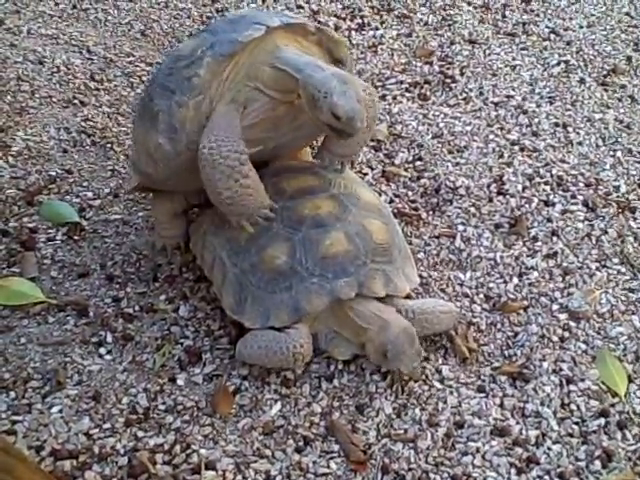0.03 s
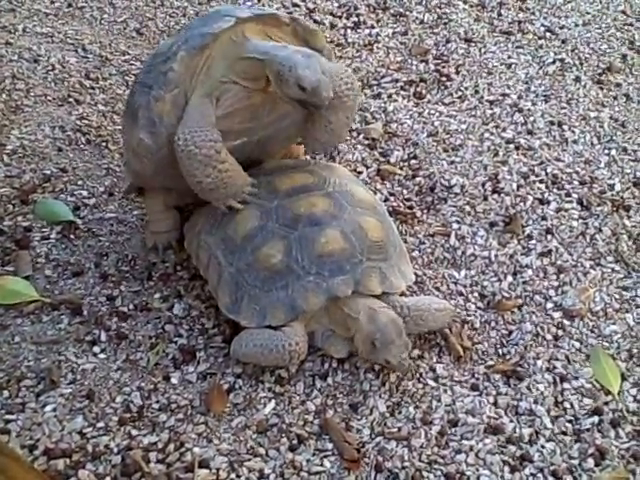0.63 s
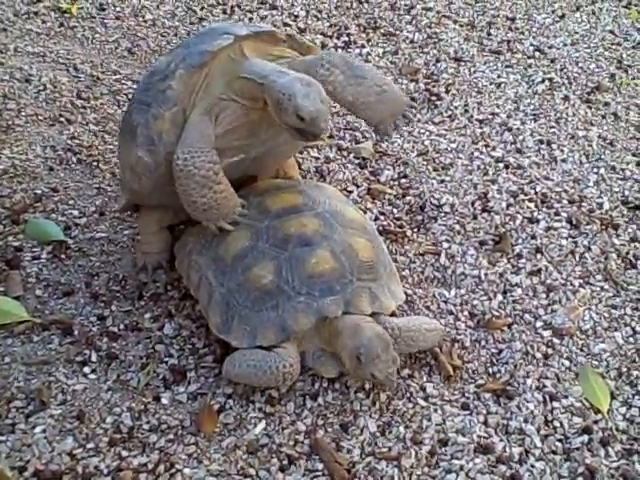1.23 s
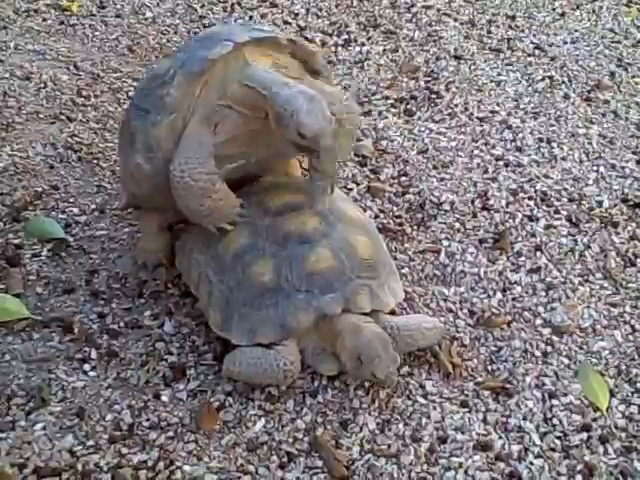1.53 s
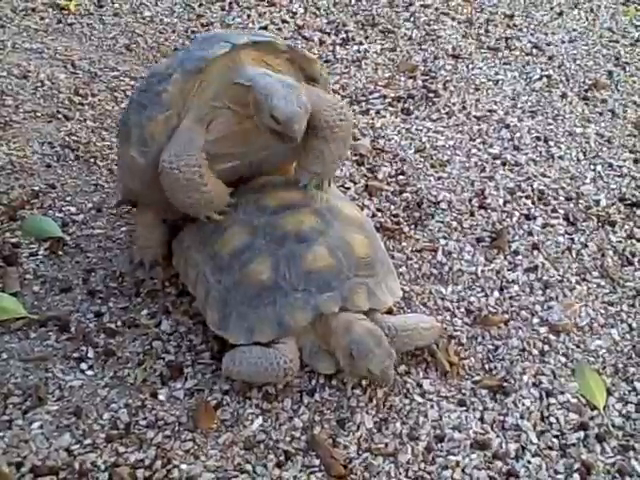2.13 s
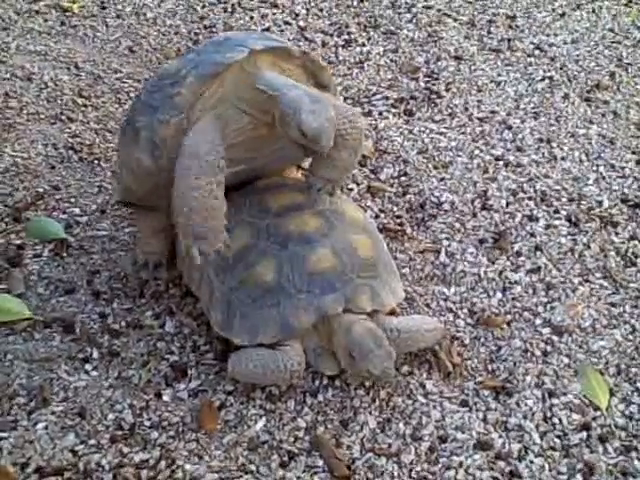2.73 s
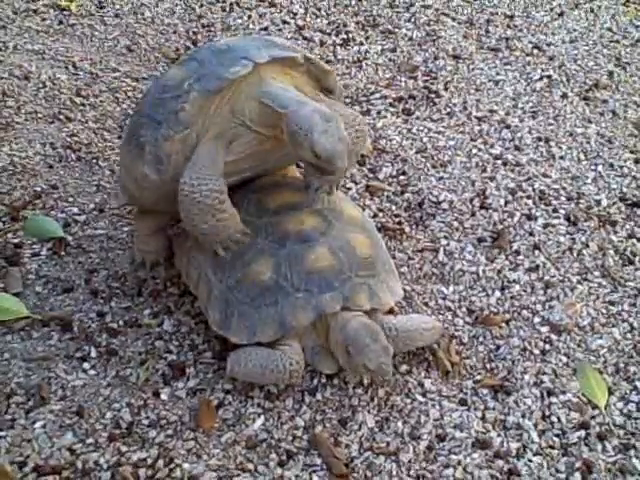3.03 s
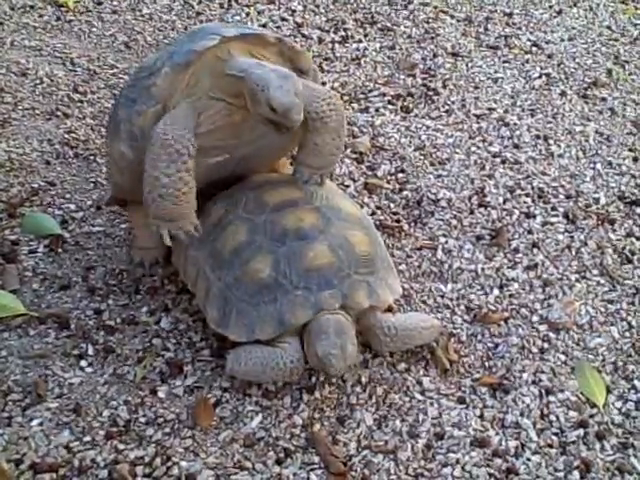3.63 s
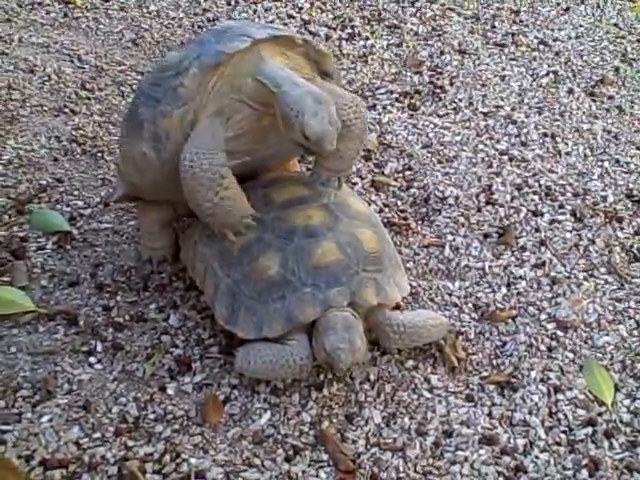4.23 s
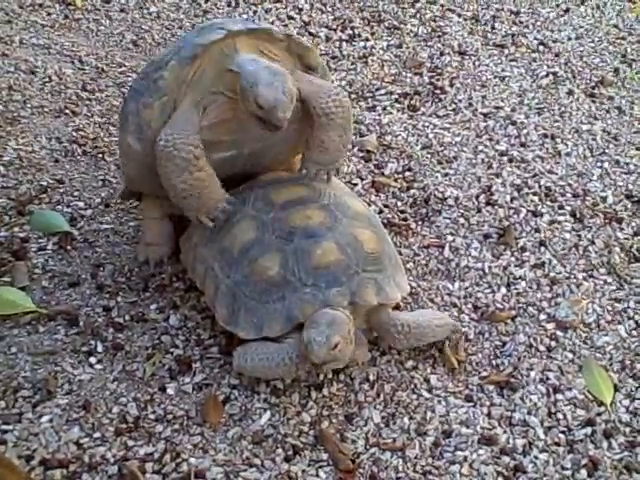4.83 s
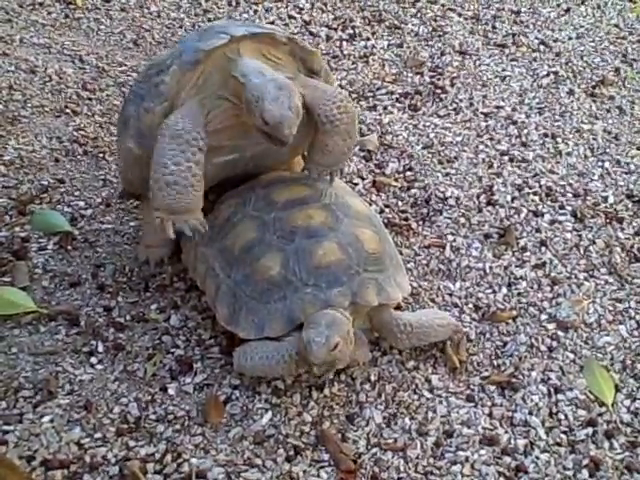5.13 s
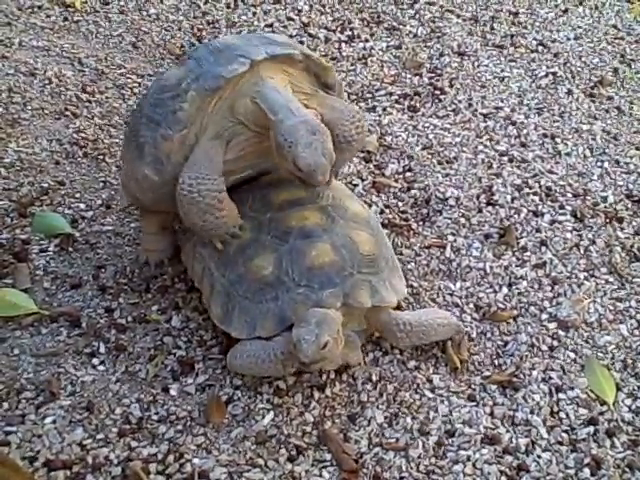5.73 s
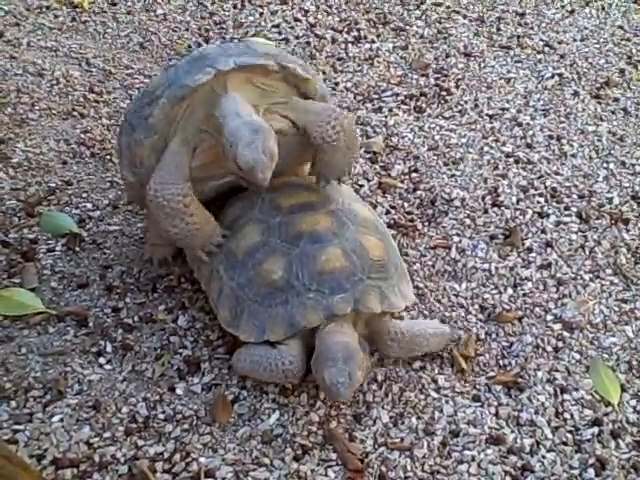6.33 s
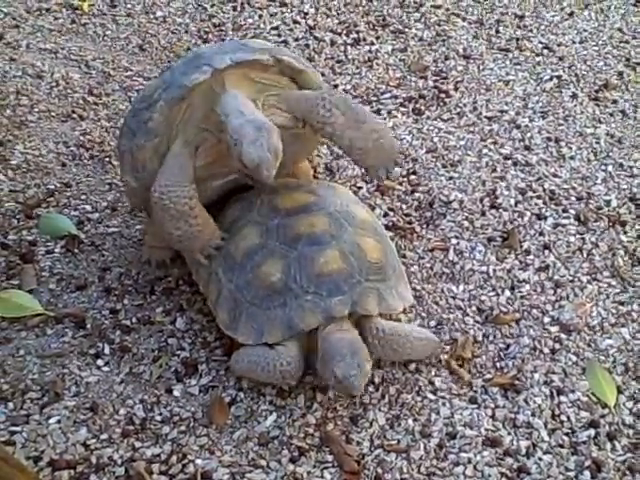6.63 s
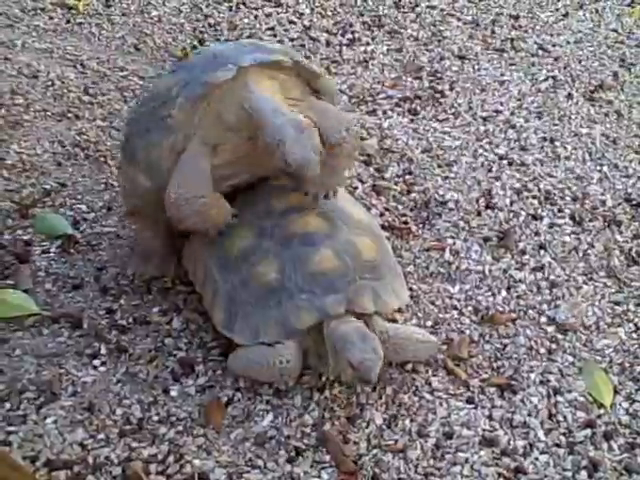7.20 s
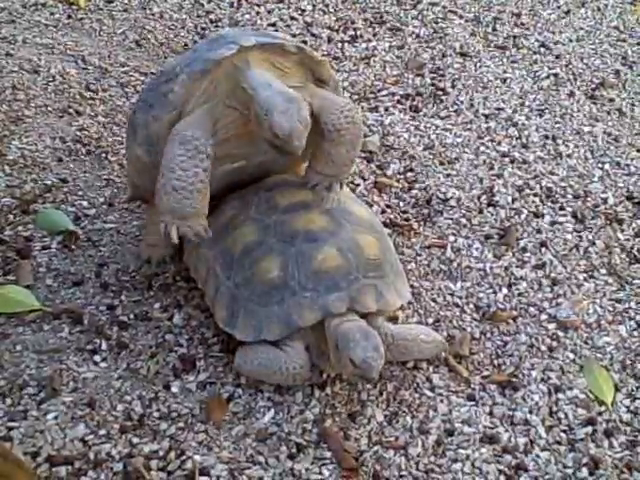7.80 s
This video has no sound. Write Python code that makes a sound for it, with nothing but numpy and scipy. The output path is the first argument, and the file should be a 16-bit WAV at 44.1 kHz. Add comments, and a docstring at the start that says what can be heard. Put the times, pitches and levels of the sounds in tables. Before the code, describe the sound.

On open ground with no echo, a tortoise lets out raspy, breathy grunts in pairs, at an even pace. Between them, shells and feet shove gravel in short bursts, single stones snap sharply, and the shells briefly rub and knock. Soft gusts buffet the small microphone, which makes clicks and hiss sound bright. A distant hum runs underneath, and one faint, far hoot comes near the end.

```python
"""A male tortoise gives a hoarse double grunt with each thrust as two tortoises mate on gravel.
His voice is a train of uneven snaps that ring in his chest, throat and mouth, with puffs of hiss.
Shells and feet shove the gravel, shells rub and knock, and single stones click. Light wind rumbles
on a small camera's microphone, whose opening rings near 7 kHz and sharpens every click and hiss.
Behind it all are a far hum and one faint hoot."""
import sys
import numpy as np
from scipy.fft import rfft, irfft, next_fast_len
from scipy.io import wavfile
from scipy.ndimage import map_coordinates

SR = 44100
rng = np.random.default_rng(int(sys.argv[2]) if len(sys.argv) > 2 else 0)


def persist_wave(psi):
    """Save psi, clipped to +-1, as 16-bit WAV."""
    counts = np.round(np.clip(psi, -1, 1) * 32767).astype(np.int16)
    wavfile.write(sys.argv[1], SR, np.atleast_2d(counts).T)


N = 351036

# tone of the wind's slow buffeting, its rumble, the far hum and the steady hiss: f/Hz, level/dB
BUFFET_TONE = [(5, -17), (18, 7), (35, 2.5), (50, 1), (70, -13), (130, -48)]
RUMBLE_TONE = [(30, -32.5), (48, -7), (62, 2), (85, -4.5), (110, -10), (150, -23.5), (300, -53)]
HUM_TONE = [(50, -14), (100, 0.5), (135, -2.5), (165, -0.5), (195, -9), (222, -8), (241, -4), (262, -9.5),
            (300, -14), (400, -17.5), (900, -61.5)]
AIR_TONE = [(150, -18.5), (330, -2.5), (520, -0.5), (800, -2), (1250, -8.5), (3000, -7), (4700, -9.5),
            (5400, -5.5), (6000, 0), (6550, 1.5), (7400, -4), (7900, -14.5), (8400, -18), (9300, -56.5)]
# gusts on the microphone: peak t/s, width/s, buffet level/dB, rumble level/dB
GUSTS = [(0.11, .025, -34, -58), (0.825, .028, -33, -32.5), (1.61, .04, -29, -42), (1.71, .025, -27, -41),
         (1.875, .03, -31, -37), (2.5, .3, -45, -48), (6.65, .02, -50, -40), (7.12, .08, -46, -43),
         (7.6, .03, -50, -37), (7.73, .07, -31, -37)]
# the course of a far, falling hoot: t/s, f/Hz, level/dB
HOOT = [(6.75, 419, -75), (6.8, 397, -57), (6.835, 355, -45), (6.869, 365, -54), (6.91, 351.3, -75)]
# shell rubbing on shell: middle t/s, level/dB, width/s, f/Hz
RUBS = [(0.61, -46.5, .01, 1500), (1.963, -41, 0.0036, 3200), (4.659, -36.5, 0.005, 2300),
        (5.958, -34.5, 0.0047, 2900), (6.017, -49, .012, 3200), (6.342, -57.5, 0.015, 2500),
        (7.282, -36.5, 0.0033, 2800)]
# dry knocks of shell on shell or stone, plus one brief extra ring of the stone's snap at 0.5166 s: t/s,
# level/dB, f/Hz
KNOCKS = [(0.507, -30, 3000), (0.5166, -21, 5630), (5.713, -24, 2600), (5.739, -20, 4605),
          (7.231, -21, 900), (7.253, -21, 1590)]
# gravel shoved along by the thrusts: t/s, length/s, relative level/dB
PUSHES = [(0.305, .14, -41.5), (0.452, .065, -39.5), (1.858, .125, -39.5), (1.99, .09, -52),
          (3.108, .09, -43), (3.24, .08, -44), (4.505, .185, -42.5), (5.502, .075, -51), (5.82, .205, -43),
          (6.24, .045, -47.5), (6.38, .04, -49), (7.04, .12, -46), (7.16, .138, -37.3), (7.315, .09, -50)]
# tone of sliding gravel and of one stone's crack: f/Hz, level/dB
GRAVEL_TONE = [(200, -19), (600, -14), (1500, -16), (3000, -12.5), (5000, -14), (6100, -4.5), (6850, -3.5),
               (7450, 0), (7950, -15.5), (8450, -16), (9200, -40.5)]
CRACK_TONE = [(150, -11), (600, 19.5), (1500, 11.5), (3200, 15.5), (5000, 18.5), (7000, -2.5),
              (8400, -20.5), (9500, -48)]
# stones snapping on stone or shell: t/s, ring level/dB, ring f/Hz, relative crack level/dB
CLICKS = [(0.0277, -24, 6740, -4), (0.5163, -23, 6600, -11), (0.6807, -28, 6710, -11),
          (1.6708, -20.5, 6690, -4), (1.8923, -9, 6840, -8.5), (1.8968, -15.5, 6990, -13),
          (1.921, -13.5, 6410, -8), (1.978, -25, 6420, -18), (2.809, -12.7, 6500, -6.5),
          (2.8426, -28, 6750, -7), (3.1014, -24.5, 6826, -16), (3.3158, -18, 7040, -15),
          (3.3195, -16.5, 6980, -12), (3.3225, -17, 6490, -10), (3.3278, -24.5, 6940, -8),
          (4.662, -13.5, 6770, -10.5), (4.6654, -17, 6770, -8), (5.5093, -27, 6590, -16),
          (5.5276, -18.5, 6460, -15), (5.5849, -15.5, 6874, -12), (5.7571, -15.5, 6890, -16),
          (5.9583, -21, 6690, -18), (5.9622, -16, 6450, -20), (6.0012, -19, 6300, -6.5),
          (6.316, -24, 6700, -5.5), (6.3424, -24.5, 7000, -1), (6.3474, -22.5, 6720, -2.5),
          (6.7793, -16.5, 6740, -8), (6.786, -20, 6750, -8), (6.9886, -20.5, 7050, -10),
          (7.11, -21, 7260, -2), (7.1314, -8.2, 6820, -10), (7.1998, -13, 6600, -15),
          (7.2017, -13.3, 6870, -18), (7.2143, -16.5, 6690, -4), (7.2303, -9.2, 6720, -10),
          (7.2471, -20.3, 6960, 1.5), (7.2526, -15, 6260, -14), (7.2731, -25, 6200, -17),
          (7.2924, -17, 6900, -5.5), (7.2957, -20, 6600, -25), (7.352, -26, 6370, -7),
          (7.4524, -26, 6860, -14), (7.7913, -23, 6200, -12)]
# resonances (notes that ring easily) of the chest and throat: f/Hz, width/Hz, level/dB
CHEST_RESONANCES = [(245, 182, 1), (492, 225, -1.5), (940, 400, -13.5)]
THROAT_RESONANCES = [(1315, 510, -8.5), (2900, 1100, -13.5), (5270, 900, -15.5)]
# the mouth's resonance, which moves as it opens differently: start t/s, f/Hz
MOUTH_RESONANCES = [(0, 1800), (1.2, 1690), (2.6, 1780), (4.0, 1760), (4.36, 1860), (5.3, 1800),
                    (6.7, 2250)]
# tone of the breath's hiss: f/Hz, level/dB
BREATH_TONE = [(2500, -25), (3500, -17.5), (5500, -22.5), (6250, -7), (6650, 2), (6900, -3), (7500, -6.5),
               (8000, -21), (8450, -21), (9100, -49.5)]
# first grunt of each pair: t/s, length/s, starting f/Hz, relative chest, throat and hiss level/dB,
# roughness/0-1, level/dB of the straining that follows, compared with the grunt
LEADS = [(0.066, .04, 305, -50.5, -49.5, -42, .55, -2), (1.638, .036, 258, -43, -52, -48, .5, -10),
         (2.972, .034, 260, -39, -37, -35, .55, -20), (4.280, .041, 256, -41.5, -36.5, -35.5, .3, -10),
         (5.626, .048, 260, -40.5, -37, -35, .45, -7), (6.989, .046, 312, -45, -38.5, -36, .42, -6)]
# second grunts (heaves) and the sounds that trail them: columns as in LEADS, without the straining
HEAVES = [(0.168, .047, 300, -40.5, -33.8, -32.5, .7), (1.742, .034, 285, -39, -42, -38.5, .65),
          (3.090, .036, 230, -41.5, -41.8, -35.5, .6), (4.387, .028, 268, -38, -32.5, -31.5, .6),
          (5.724, .031, 275, -38, -33.5, -36.5, .45), (7.080, .038, 300, -39, -31.5, -33, .42)]
TAILS = [(0.288, .085, 298, -47, -50.5, -37.5, .45), (1.775, .021, 342, -42, -42, -39, .4),
         (1.846, .022, 295, -49, -43, -50, .6), (3.132, .028, 268, -43.5, -51, -38.5, .65),
         (4.421, .112, 337, -42.5, -36.8, -33, .3), (5.766, .062, 320, -43, -39.5, -36, .55),
         (7.119, .064, 322, -44, -37.5, -35.5, .38)]

# how each kind of grunt moves: rise/s, fade/(dB/s), release/s, pitch slide/(Hz/s), bend/(Hz/s^2)
LEAD_SHAPE = (.015, 70, .009, -900, 33000)
HEAVE_SHAPE = (.019, 60, .010, -1700, 4000)
TAIL_SHAPE = (.012, 70, .012, -380, -6000)


def amp(db):
    """Turn decibels into a number to multiply by."""
    return 10 ** (np.asarray(db) / 20)


def unit(x):
    """Scale a sound to an average strength (rms) of 1."""
    return x / np.sqrt(np.mean(x ** 2) + 1e-20)


def noise():
    """White noise: an even hiss."""
    return rng.standard_normal(N)


def curve(times, values, **ends):
    """Join points with straight lines, one value per sample."""
    return np.interp(np.arange(N) / SR, times, values, **ends)


def wobble(rate):
    """A smooth curve through random points, `rate` of them a second."""
    points = rng.standard_normal(int(N * rate / SR) + 4)
    return map_coordinates(points, [np.arange(N) * rate / SR])


def envelope(length, attack, fade_db_per_s, release):
    """Loudness over time: a smooth rise, a hold that may fade, then a quick dying away."""
    t = np.arange(SR // 2) / SR
    rise = np.sin(np.pi / 2 * np.minimum(t / attack, 1)) ** 2
    return rise * amp(-fade_db_per_s * t) * np.exp(-np.maximum(t - length, 0) / release)


def filtered(x, response):
    """Turn each frequency up or down by response(frequency)."""
    size = next_fast_len(len(x) + 8192)
    return irfft(rfft(x, size) * response(np.fft.rfftfreq(size, 1 / SR)), size)[:len(x)]


def coloured(x, tone):
    """Give a sound the tone in a table, at strength 1."""
    f, db = np.transpose(tone)
    return unit(filtered(x, lambda hz: amp(np.interp(np.log(hz + 1), np.log(f), db))))


def resonate(x, resonances):
    """Let a sound ring through resonances, added with alternating signs, at strength 1."""
    def response(f):
        return sum((-1) ** k * amp(db) * 1j * f * width / (hz * hz - f * f + 1j * f * width)
                   for k, (hz, width, db) in enumerate(resonances))
    return unit(filtered(x, response))


def add(track, start, sound):
    """Mix a sound into a track, `start` seconds in."""
    part = track[max(round(start * SR), 0):][:len(sound)]
    part += sound[:len(part)]


def wind(buffet_db=-45, rumble_db=-49, swing_db=1.5):
    """A restless breeze and short gusts push on the microphone."""
    t = np.arange(N) / SR
    buffet = amp(buffet_db + swing_db * wobble(7))
    rumble = amp(rumble_db + swing_db * wobble(7))
    for peak, width, gust_buffet_db, gust_rumble_db in GUSTS:
        gust = np.exp(-.5 * ((t - peak) / width) ** 2)
        buffet = np.hypot(buffet, amp(gust_buffet_db) * gust)
        rumble = np.hypot(rumble, amp(gust_rumble_db) * gust)
    return buffet * coloured(noise(), BUFFET_TONE) + rumble * coloured(noise(), RUMBLE_TONE)


def hum_and_hiss(hum_db=-48.3, hiss_db=-46.3):
    """A far hum swells and sinks a little under a nearly steady hiss."""
    hum = amp(hum_db + 1.2 * wobble(8)) * coloured(noise(), HUM_TONE)
    hiss = amp(hiss_db + .3 * wobble(5)) * coloured(noise(), AIR_TONE)
    return hum + hiss


def hoot():
    """One soft, slightly unsteady note from far away."""
    times, hz, db = np.transpose(HOOT)
    cycles = np.cumsum(curve(times, hz) * (1 + .02 * wobble(60))) / SR
    return curve(times, amp(db), left=0, right=0) * np.sin(2 * np.pi * cycles)


def shell_rubs(width_hz=1300):
    """Shell slides briefly over shell with a dull rasp."""
    track, t = np.zeros(N), np.arange(N) / SR
    for middle, db, width, hz in RUBS:
        swell = np.exp(-.5 * ((t - middle) / width) ** 2)
        track += amp(db) * swell * resonate(noise(), [(hz, width_hz, 0)])
    return track


def shell_knocks(ring_s=.0028):
    """A shell is bone under horn and hardly rings: a knock lasts only a few cycles."""
    track, t = np.zeros(N), np.arange(SR // 50) / SR
    for start, db, hz in KNOCKS:
        add(track, start, amp(db - 60 * t / ring_s) * np.sin(2 * np.pi * hz * t))
    return track


def gravel(grains_per_s=2500, spread_db=4, clump_db=2, boost_db=.5):
    """Each push makes a crowd of tiny stones tap each other, in clumps."""
    push = np.zeros(N)
    for start, length, db in PUSHES:
        shove = envelope(length, attack=.022, fade_db_per_s=3, release=.018)
        add(push, start, amp(db + boost_db) * shove)
    taps = (rng.random(N) < grains_per_s / SR) * np.sign(noise())
    sizes = amp(spread_db * np.minimum(rng.exponential(size=N), 4))
    clumps = amp(clump_db * wobble(90))
    return push * coloured(taps * sizes * clumps, GRAVEL_TONE)


def stray_stones(count=10, level_db=-30, spread_db=6, ring_hz=6600, crack_db=-11):
    """Small stones tip at random moments during the pushes, giving more rows like those in CLICKS."""
    starts, lengths, _ = np.transpose(PUSHES)
    shares = np.cumsum(lengths) / lengths.sum()  # longer pushes are picked more often
    rows = []
    for which, when, size in rng.random((count, 3)):
        k = np.searchsorted(shares, which)
        rows.append((starts[k] + when * lengths[k], level_db + spread_db * (size - .5), ring_hz, crack_db))
    return rows


def stone_clicks(ring_s=.0046, grit_s=.0091, pebble_hz=3400, crack_trim_db=-1):
    """A stone slips with a snap, some grit and a brief note; the snap rings the microphone's opening."""
    track, t = np.zeros(N), np.arange(SR // 50) / SR
    rise = 1 - np.exp(-t / .00018)
    for start, db, hz, crack_db in list(CLICKS) + stray_stones():
        ring = np.sin(2 * np.pi * hz * t) * amp(-60 * t / ring_s) * rise
        ring /= np.abs(ring).max()
        note_hz = pebble_hz * np.exp(.33 * rng.standard_normal())
        note = .095 * np.sin(2 * np.pi * note_hz * t)
        grit = .18 * rng.standard_normal(len(t))
        snap = (t == 0) + (grit + note) * amp(-60 * t / grit_s)
        crack = coloured(np.roll(snap, 10), CRACK_TONE)
        crack /= np.abs(crack).max()
        add(track, start, amp(db) * (ring + amp(crack_db + crack_trim_db) * crack))
    return track


def effort(throat_fade_db_per_s=55, hiss_linger_s=.006, strain_throat_db=-7):
    """How the male works his voice over time: pitch, roughness, and chest, throat and hiss strength."""
    kinds = [(LEADS, LEAD_SHAPE), (HEAVES, HEAVE_SHAPE), (TAILS, TAIL_SHAPE)]
    pitch, roughness = np.full(N, float(LEADS[0][2])), np.zeros(N)
    power = np.zeros((3, N))  # overlapping grunts add up as squares
    chest, throat, hiss = power
    for row, shape in sorted((tuple(row), shape) for rows, shape in kinds for row in rows):
        start, length, hz, chest_db, throat_db, hiss_db, rough, *_ = row
        attack, fade, release, slide, bend = shape
        jump = round((start + attack / 2) * SR)  # the new pitch takes over halfway up the rise
        t = np.minimum(np.arange(jump, N) / SR - start, length + release)
        pitch[jump:] = hz + slide * t + bend * t ** 2
        roughness[jump:] = rough
        # as a grunt runs out of effort, the throat weakens first and the hiss lasts longest
        chest_swell = envelope(length, attack, fade, release)
        throat_swell = envelope(length, attack, fade + throat_fade_db_per_s, release)
        hiss_swell = envelope(length, attack, fade, release + hiss_linger_s)
        add(chest, start, (amp(chest_db) * chest_swell) ** 2)
        add(throat, start, (amp(throat_db) * throat_swell) ** 2)
        add(hiss, start, (amp(hiss_db) * hiss_swell) ** 2)
    # he keeps straining between the two grunts, mostly as hiss
    for (start, _, _, _, throat_db, hiss_db, _, strain_db), (heave_start, *_) in zip(LEADS, HEAVES):
        strain = amp(strain_db) * envelope(heave_start - start, attack=.04, fade_db_per_s=0, release=.02)
        add(throat, start, (amp(throat_db + strain_throat_db) * strain) ** 2)
        add(hiss, start, (amp(hiss_db) * strain) ** 2)
    return pitch, roughness, np.sqrt(power)


def throat_and_mouth(source, mouth_width_hz=380):
    """The throat always rings at the same notes; the mouth adds one that depends on how it opens."""
    starts, mouth_hz = np.transpose(MOUTH_RESONANCES)
    current = np.searchsorted(starts, np.arange(N) / SR, side="right") - 1
    return sum((current == k) * resonate(source, sorted(THROAT_RESONANCES + [(hz, mouth_width_hz, 0)]))
               for k, hz in enumerate(mouth_hz))


def grunts(waver=.025, flutter_db=6.5, rasp=.7, puff_decay=1.6):
    """The voice box snaps unevenly; each snap rings chest, throat and mouth and lets out a puff of hiss."""
    pitch, roughness, (chest, throat, hiss) = effort()
    jitter = .09 * roughness * wobble(260)
    cycles = np.cumsum(pitch * (1 + jitter + waver * wobble(55))) / SR
    beats = np.diff(np.floor(cycles), prepend=0)  # one tick per cycle
    snaps = unit(beats * amp(flutter_db * roughness * wobble(280)))
    puffs = np.exp(-puff_decay * (cycles % 1))  # air escapes just after each snap
    source = snaps + rasp * np.sqrt(roughness) * unit(puffs * noise())
    breath = puffs * noise() * amp(1.8 * wobble(200))
    low = chest * amp(.5) * resonate(beats, CHEST_RESONANCES)
    middle = throat * amp(-.6) * throat_and_mouth(source)
    high = hiss * amp(.5) * coloured(breath, BREATH_TONE)
    return low + middle + high


def scene():
    """Everything mixed into one channel, on open ground where nothing echoes."""
    tortoises = grunts() + gravel() + stone_clicks() + shell_knocks() + shell_rubs()
    return (tortoises + hoot() + wind() + hum_and_hiss())[None]


def record(dry, top_hz=8880):
    """The camera sharply cuts off the highest treble."""
    return np.array([filtered(x, lambda hz: 1 / np.sqrt(1 + (hz / top_hz) ** 100)) for x in dry])


dry = scene()
out = record(dry)
persist_wave(out)
```